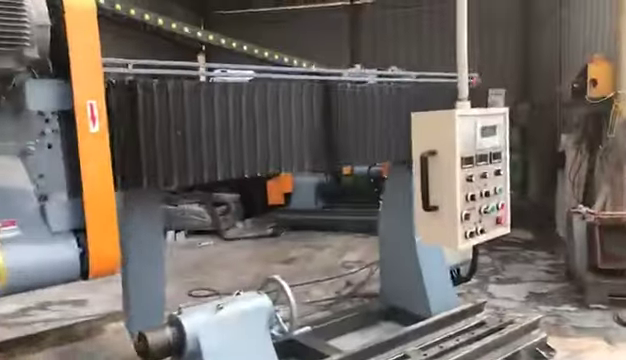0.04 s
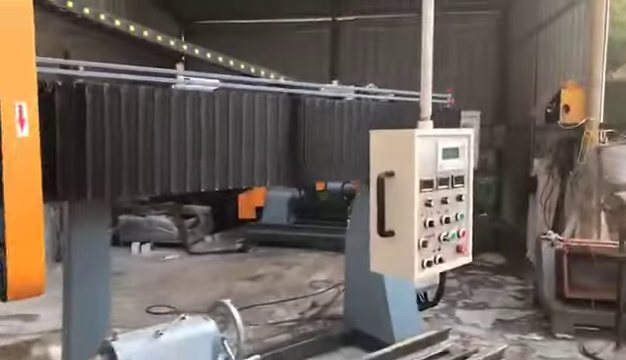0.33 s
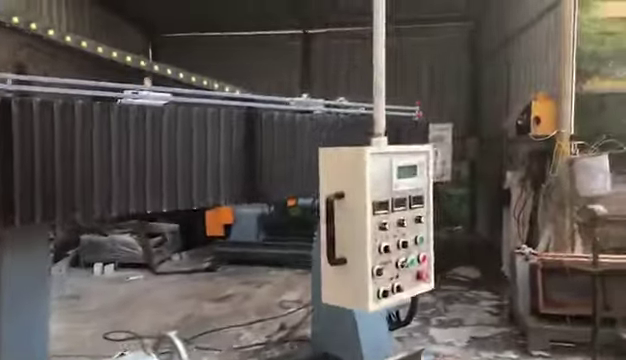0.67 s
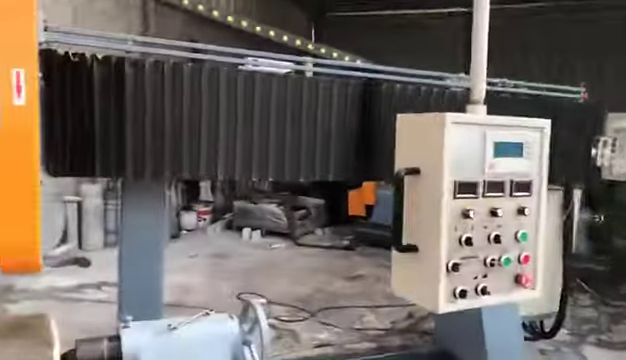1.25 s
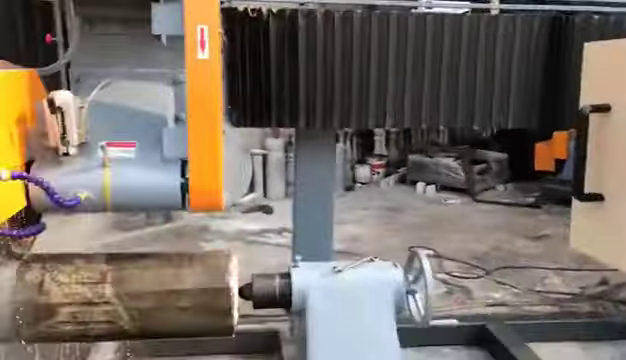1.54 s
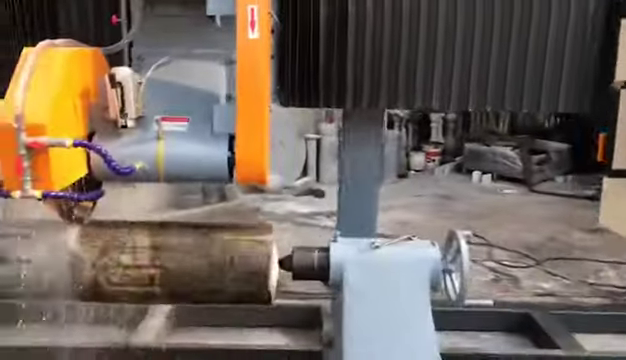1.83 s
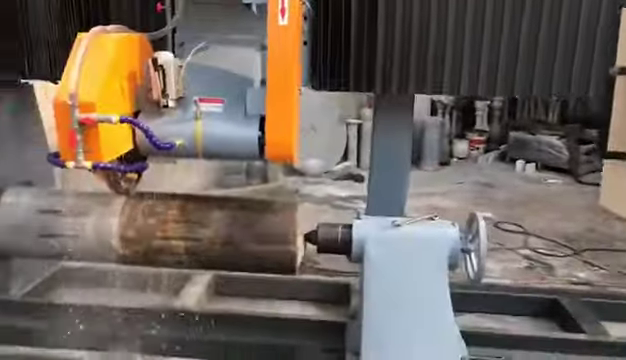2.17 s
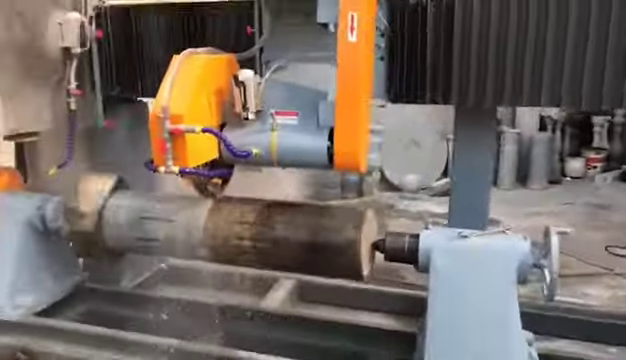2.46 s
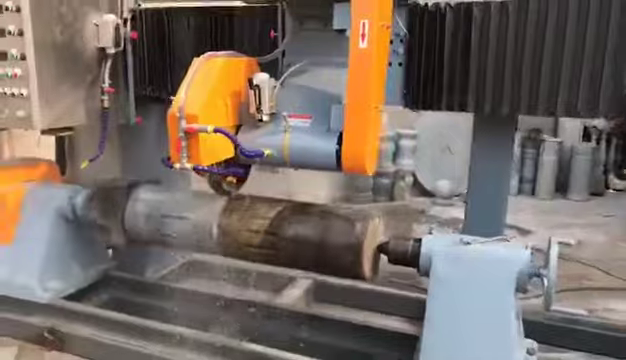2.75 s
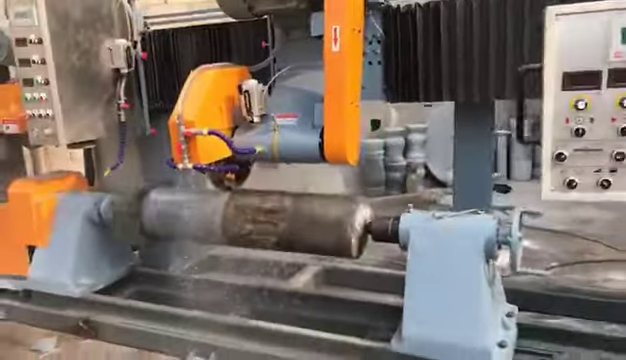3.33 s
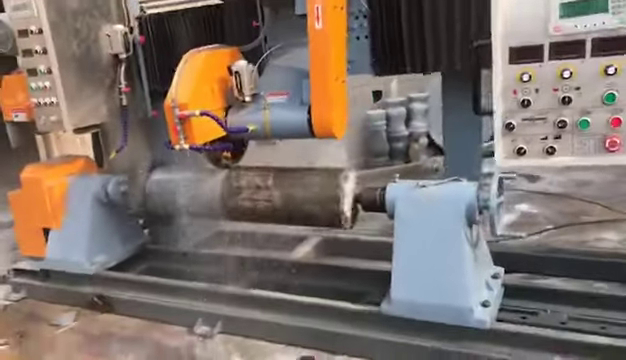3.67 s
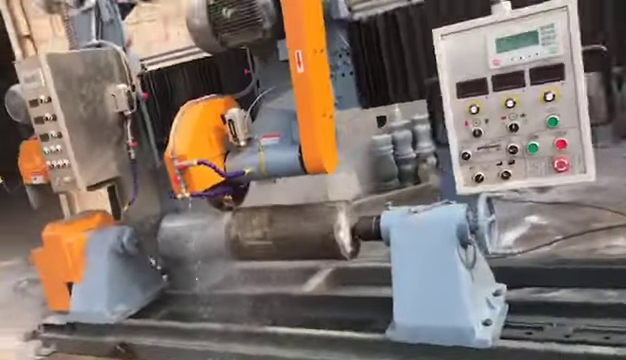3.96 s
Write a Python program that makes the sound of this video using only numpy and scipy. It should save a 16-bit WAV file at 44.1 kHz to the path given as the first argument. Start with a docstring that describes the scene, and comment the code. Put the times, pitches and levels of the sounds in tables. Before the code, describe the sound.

A stone lathe's blade grinds loudly into a turning column, ringing over hissing water.

```python
"""A harsh, pulsing grind: a stone lathe's water-cooled diamond blade cuts a turning column.
The same rim grit scrapes the stone on every turn, and the high side of the rim bites and rings the
blade once a turn. Chips and spray hiss over the hum of the drive and faint bass noise.
The microphone is carried past, so the reflections and the colour shift."""
import sys
import numpy as np
from scipy import signal
from scipy.fft import rfft, irfft
from scipy.io import wavfile
from scipy.ndimage import uniform_filter1d, minimum_filter1d

SR = 44100
rng = np.random.default_rng(int(sys.argv[2]) if len(sys.argv) > 2 else 0)


def generate_wav(signal):
    """Clip the signal to [-1, 1] and save it as 16-bit WAV at the path in sys.argv[1]."""
    frames = np.transpose(np.atleast_2d(signal))
    scaled = np.clip(frames, -1, 1) * 32767
    pcm = np.round(scaled).astype(np.int16)
    wavfile.write(sys.argv[1], SR, pcm)


N = 176400
SPIN_HZ = 35.765
FLICKER_HZ = 36
SCRAPE_BITE_DB = 1  # per unit of bite pressure


def undb(db):
    return 10 ** (np.asarray(db) / 20)


def unit_rms(x):
    return x / np.sqrt(np.mean(x ** 2))


def times():
    return np.arange(N) / SR


def curves(table):
    """Each column after the first as a curve in time."""
    rows = np.array(table, float)
    return [np.interp(times(), rows[:, 0], column) for column in rows.T[1:]]


def wander(rate_hz):
    """Smooth random motion, rms 1."""
    hold = int(SR / rate_hz)
    steps = np.repeat(rng.standard_normal(N // hold + 1), hold)
    return unit_rms(uniform_filter1d(uniform_filter1d(steps, hold), hold)[:N])


def swell(middle_s, half_length_s):
    """Raised-cosine rise and fall."""
    return np.cos(np.pi / 2 * np.clip((times() - middle_s) / half_length_s, -1, 1)) ** 2


def colour(x, points):
    """Filter by (Hz, dB) points."""
    hz, db = np.array(points, float).T
    f = np.maximum(np.arange(N // 2 + 1) * SR / N, 1)
    return irfft(rfft(x) * undb(np.interp(np.log(f), np.log(hz), db)), N)


def band(x, low_hz, high_hz):
    """Steep band-pass."""
    f = np.maximum(np.arange(N // 2 + 1) * SR / N, 1)
    return irfft(rfft(x) / np.sqrt((1 + (low_hz / f) ** 32) * (1 + (f / high_hz) ** 32)), N)


def resonate(x, hz, width_hz):
    """Two identical resonators in series, each width_hz wide."""
    f = np.arange(N // 2 + 1) * SR / N
    return irfft(rfft(x) / (1 + 2j * (f - hz) / width_hz) ** 2, N)


def blend(main, other, share):
    """Mix in which `other` has the given share of the power."""
    return np.sqrt(1 - share) * unit_rms(main) + np.sqrt(share) * unit_rms(other)


# Each row: time in seconds, level in dB.
BASS_LEVEL = [(0, -49), (.5, -50), (.75, -61), (1.0, -84), (1.6, -73), (1.8, -52), (2.45, -47), (2.7, -56),
              (3.3, -51), (3.7, -63), (4, -59)]


def bass_noise():
    """Faint bass noise, strongest a little after two seconds."""
    noise = band(rng.standard_normal(N), low_hz=47, high_hz=134)
    return unit_rms(noise) * undb(curves(BASS_LEVEL)[0])


# Each row: frequency in Hz, base rms level in dB.
HUM_PARTIALS = [(177.8, -47.5), (250.4, -60), (286.1, -49), (429.2, -51.5), (464.9, -53.5), (572.2, -51.5),
                (679.5, -50.5)]
# Each row: time in seconds, gain on all partials in dB.
HUM_GAIN = [(0, -7), (.3, 2.5), (1.7, 2), (2.1, -1.5), (2.4, 1), (3.0, -1), (3.45, -8), (3.75, 1.5),
            (4, -1.5)]


def drive_hum(waver_db=2.1, drift_rad=0.73):
    """Motor and spindle hum; each partial wavers in level and phase."""
    t, gain_db, out = times(), curves(HUM_GAIN)[0], 0
    for hz, db in HUM_PARTIALS:
        amplitude = np.sqrt(2) * undb(db + gain_db + waver_db * wander(3.4))
        phase = 2 * np.pi * (hz * t + rng.random()) + drift_rad * wander(2.82)
        out += amplitude * np.sin(phase)
    return out


# Each row: frequency in Hz, relative gain in dB.
FRAME_COLOUR = [(25, -43), (90, -33), (120, -13), (160, -5.5), (260, 1.5), (360, -3), (600, -3.5),
                (750, -0.5), (1200, 3), (1400, -7), (2500, -43)]
# Each row: time in seconds, level in dB.
FRAME_LEVEL = [(0, -31.5), (.3, -30), (1.1, -32.5), (2.1, -36), (2.7, -31.5), (3.3, -32), (4, -33)]


def machine_frame(grit, waver_db=1.42):
    """The frame rumbles, shaken by the scrape and by noise."""
    shaking = blend(grit, rng.standard_normal(N), share=0.58)
    level_db = curves(FRAME_LEVEL)[0] + waver_db * wander(FLICKER_HZ)
    return unit_rms(colour(shaking, FRAME_COLOUR)) * undb(level_db)


# Each row: frequency in Hz, relative gain in dB.
SPRAY_COLOUR = [(1500, -33), (4000, 11.5), (8000, -19), (10500, 3), (12000, -14), (13000, -26),
                (15000, -32)]


def spray(drops_per_s=3400, spread_db=2, level_db=-32.5):
    """Dense droplets of cooling water flung from the blade."""
    drops = (rng.random(N) < drops_per_s / SR) * rng.standard_normal(N)
    sizes = undb(spread_db * np.minimum(rng.exponential(size=N), 4))
    return unit_rms(colour(drops * sizes, SPRAY_COLOUR)) * undb(level_db)


def rim_grit(paths=12, points=16384, speed_spread_m_s=0.18, hand_sway_m=0.012):
    """A grit pattern repeats every turn, heard along echo paths that change as the microphone moves."""
    noise = rng.standard_normal(int(SR / SPIN_HZ))
    flat_noise = irfft(np.exp(1j * np.angle(rfft(noise))))
    pattern = signal.resample(flat_noise, points)
    t, out = times(), 0
    for speed_m_s in np.linspace(-1, 1, paths) * np.sqrt(3) * speed_spread_m_s:
        delay_s = (speed_m_s * t + hand_sway_m * wander(2.065)) / 343
        turns = SPIN_HZ * (t - delay_s) + rng.random()
        out += np.interp(turns % 1, np.arange(points) / points, pattern)
    return unit_rms(out)


# Each row: time in seconds, depth of the pressure swing as a factor.
BITE_DEPTH = [(0, 1), (.9, 0.72), (1.3, 1.1), (1.6, 1.17), (2.4, 1.04), (3, 1.06), (4, 1.34)]


def bite_pressure(centre_turns=0.074, notch=0.44):
    """Pressure of the rim on the stone: a broad swell and a short slack once a turn."""
    angle = 2 * np.pi * (SPIN_HZ * times() - centre_turns)
    return (np.cos(angle) - notch * np.cos(2 * angle)) * curves(BITE_DEPTH)[0]


def knocks(hz, width_hz, strike_turns, scatter_db=0.5):
    """One knock a turn swells and dies in a damped resonance; returns ring and envelope."""
    turns = SPIN_HZ * times() + 2  # offset keeps the index positive
    index = np.floor(turns - strike_turns).astype(int)
    strengths = undb(-scatter_db * rng.standard_normal(N // 100))
    age_s = (turns - strike_turns - index) / SPIN_HZ
    envelope = age_s ** 3 * np.exp(-np.pi * width_hz * age_s)
    tone = np.sin(2 * np.pi * hz * (turns - index) / SPIN_HZ)
    return unit_rms(strengths[index] * envelope * tone), envelope / envelope.max()


# Two blade modes. Each row: time in seconds, frequency in Hz, strike point in turns, level in dB.
LOWER_RING = [(0, 825, -0.26, -51), (.28, 825, -0.44, -38.5), (.7, 830, -0.2, -30), (1.0, 850, -0.038, -42),
              (1.35, 880, -0.24, -36.5), (1.8, 895, -0.25, -34), (2.1, 895, -0.17, -53),
              (2.5, 848, -0.19, -33), (2.9, 857, -0.25, -31.5), (3.3, 845, -0.25, -37),
              (3.7, 837, -0.25, -32), (4, 840, -0.12, -31.5)]
UPPER_RING = [(0, 1090, 0.0052, -47), (.35, 1094, 0.0029, -33.5), (.78, 1068, -0.054, -24.5),
              (1.15, 1065, -0.069, -28), (1.7, 1046, -0.0092, -29), (2.15, 1035, -0.091, -35.5),
              (2.5, 1067, -0.18, -31.5), (3.05, 1095, -0.1, -29.5), (3.45, 1060, -0.14, -34.5),
              (3.75, 1064, -0.13, -33), (4, 1070, -.08, -34)]


def blade_rings(grit):
    """The knock rings two low resonances of the blade; the scrape keeps them alive in between."""
    pulse, out = undb(SCRAPE_BITE_DB * bite_pressure()), 0
    for table, width_hz in (LOWER_RING, 175), (UPPER_RING, 202):
        hz, strike_turns, db = curves(table)
        struck, envelope = knocks(hz, width_hz, strike_turns)
        scrape = blend(grit, rng.standard_normal(N), share=0.25)
        scraped = resonate(scrape, hz.mean(), width_hz) * (1 - envelope) * pulse
        out += blend(struck, scraped, share=0.22) * undb(db)
    return out


# Each row: middle and half-length in seconds, frequency in Hz, strike point in turns, level in dB.
CHATTER_SPELLS = [(1.074, 0.25, 3770, .10, -23), (1.65, .24, 3330, -0.055, -25),
                  (3.002, 0.28, 3746, 0.0076, -21), (3.146, 0.18, 3290, 0.51, -23),
                  (3.166, 0.28, 3300, -0.068, -23.5), (3.358, 0.39, 3760, 0.048, -23.5),
                  (3.583, 0.25, 3660, 0.76, -23), (3.722, 0.19, 3540, -0.14, -22)]


def chatter(width_hz=205, creep_turns_per_s=0.19):
    """In spells the rim catches on the stone and raps a high blade resonance on every turn."""
    out = 0
    for middle_s, half_length_s, hz, strike_turns, db in CHATTER_SPELLS:
        creep_turns = creep_turns_per_s * (times() - middle_s)
        ring, _ = knocks(hz, width_hz, strike_turns + creep_turns)
        out += ring * swell(middle_s, half_length_s) * undb(db)
    return out


# Each row: middle and half-length in seconds, frequency and width in Hz, level in dB.
SINGING_SPELLS = [(0.324, .36, 825, 40, -30), (0.34, 0.3, 2070, 130, -26.5), (.5, 0.15, 6470, 250, -23),
                  (.6, 0.45, 3580, 300, -22.5), (0.72, 0.4, 2575, 200, -25), (0.85, 0.38, 4050, 200, -23.5),
                  (.95, 0.99, 2310, 105, -30.5), (0.995, 0.42, 2800, 130, -30),
                  (1.507, 0.23, 2746, 130, -28), (1.61, 0.21, 4200, 160, -21.5),
                  (1.58, 0.38, 3550, 250, -22), (1.86, 0.36, 1897, 105, -30.5), (2.1, 0.54, 3390, 330, -27),
                  (2.47, 0.17, 3430, 129, -24), (2.554, 0.17, 4960, 160, -22),
                  (2.613, .2, 3996, 130, -22.5), (2.71, 0.34, 1955, 105, -31), (3.3, 0.93, 5410, 240, -22),
                  (3.7, 0.3, 5820, 220, -22.5), (3.925, 0.21, 2680, 130, -29)]


def singing(bite_db=3):
    """As the contact shifts, the scrape catches one blade resonance after another."""
    pulse, out = undb(bite_db * bite_pressure()), 0
    scrape = blend(rim_grit(), rng.standard_normal(N), share=0.1)
    for middle_s, half_length_s, hz, width_hz, db in SINGING_SPELLS:
        envelope = swell(middle_s, half_length_s)
        tone = resonate(scrape, hz, width_hz) * pulse * envelope
        normalise = np.sqrt(np.sum(envelope ** 2) / np.sum(tone ** 2))
        out += tone * normalise * undb(db)
    return out


# Each row: low and high edge in Hz, chip noise as a share of the power, trim in dB.
GRIND_BANDS = [(2743, 4520, 0.3, -1), (1216, 2592, 0.24, -1.07), (4580, 6060, 0.5, 0.22),
               (6170, 8820, 0.6, -0.63), (9200, 15600, 0.99, 0.5)]
# Each row: time in seconds, then the level before trim in dB for each of the five bands in order.
GRIND_LEVELS = [(0.0, -23.5, -30, -24, -24, -36), (0.03, -22.5, -29, -27.5, -21, -35),
                (0.26, -18, -26, -19, -17.5, -29.5), (0.61, -19, -23, -21, -16, -30),
                (0.65, -16, -21.5, -18.5, -15, -26), (0.87, -18, -24.5, -21, -16.5, -29.5),
                (1.3, -17.5, -25.5, -17.5, -16, -31), (1.4, -17.5, -28.5, -18, -18, -31),
                (1.54, -17.5, -23.5, -18, -16, -31), (1.78, -22, -28.5, -18.5, -19.5, -34),
                (1.93, -24, -31.5, -24, -23, -41), (2.15, -23.5, -31.5, -25, -25, -47),
                (2.23, -25.5, -31, -23.5, -26, -40), (2.49, -21, -23.5, -19, -21.5, -32.5),
                (2.66, -16, -24.5, -17, -20.5, -29.5), (3.3, -16.5, -25.5, -18, -19.5, -29),
                (3.71, -17.5, -25, -17.5, -22, -26), (3.89, -18.5, -27.5, -16, -19.5, -31.5),
                (4.0, -19.5, -22.5, -18.5, -21.5, -31)]
# Shape within the bands. Each row: frequency in Hz, relative gain in dB.
GRIND_COLOUR = [(1200, -32), (1330, -11), (1550, -11.5), (2000, -9), (2450, -8), (2850, 0), (3650, 4),
                (4050, 1), (4400, -3.5), (5100, -4.5), (5800, -1.5), (6600, 1), (7800, -3.5), (9000, -7.5),
                (10700, -12.5), (12000, -20.5), (13500, -43), (15500, -45)]


def grinding(grit, chip_bite_db=1.67, stone_db=0.4, flicker_db=0.35):
    """Repeating scrape plus fresh chip noise, swelling once a turn and with the uneven stone."""
    pressure, out = bite_pressure(), 0
    uneven_db = stone_db * wander(FLICKER_HZ)
    scrape = grit * undb(SCRAPE_BITE_DB * pressure)
    for (low_hz, high_hz, chip_share, trim_db), db in zip(GRIND_BANDS, curves(GRIND_LEVELS)):
        chips = rng.standard_normal(N) * undb(chip_bite_db * pressure)
        cut = colour(blend(scrape, chips, chip_share), GRIND_COLOUR)
        gain = undb(db + trim_db + uneven_db + flicker_db * wander(FLICKER_HZ))
        out += unit_rms(band(cut, low_hz, high_hz)) * gain
    return out


def scene():
    """The blade over the machine and the water, in mono."""
    grit = rim_grit()
    blade = grinding(grit) + singing() + chatter() + blade_rings(grit)
    background = drive_hum() + machine_frame(grit) + bass_noise() + spray()
    return (blade + background)[None]


def record(dry, ceiling=0.96, top_hz=15655):
    """A fast limiter holds the highest peaks; a steep low-pass cuts the top."""
    needed_gain = ceiling / np.maximum(np.abs(dry), ceiling)
    gain = uniform_filter1d(minimum_filter1d(needed_gain, size=129), size=129)
    low_pass = signal.ellip(10, .02, 70, top_hz, fs=SR, output="sos")
    return signal.sosfiltfilt(low_pass, dry * gain)


dry = scene()
out = record(dry)
generate_wav(out)
```